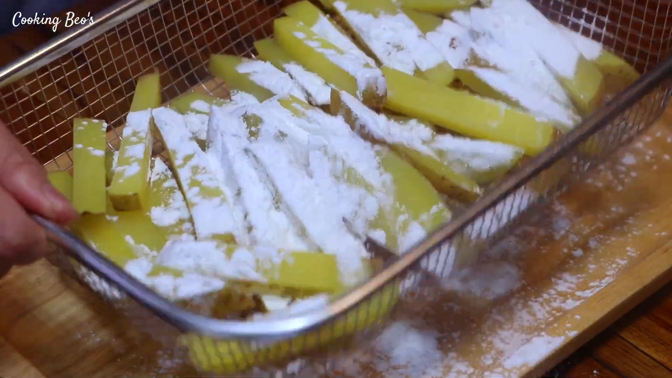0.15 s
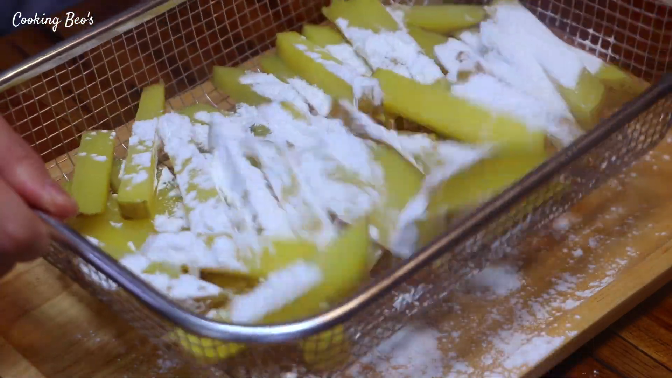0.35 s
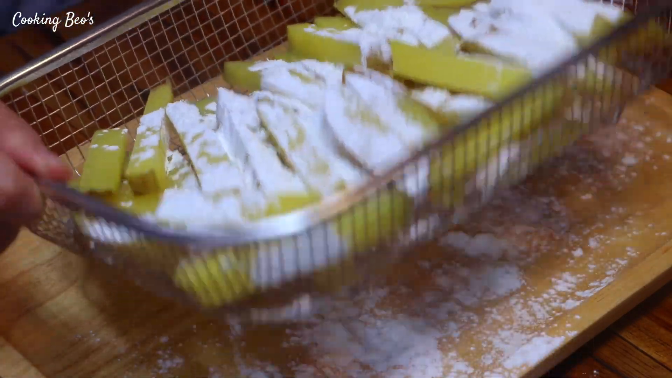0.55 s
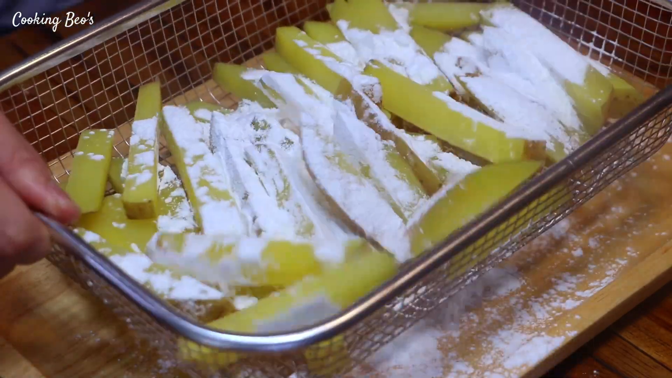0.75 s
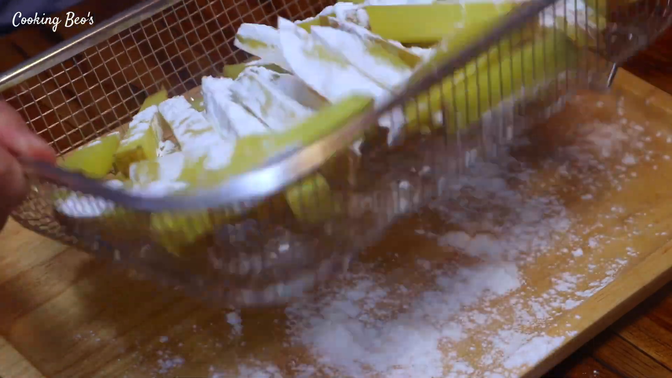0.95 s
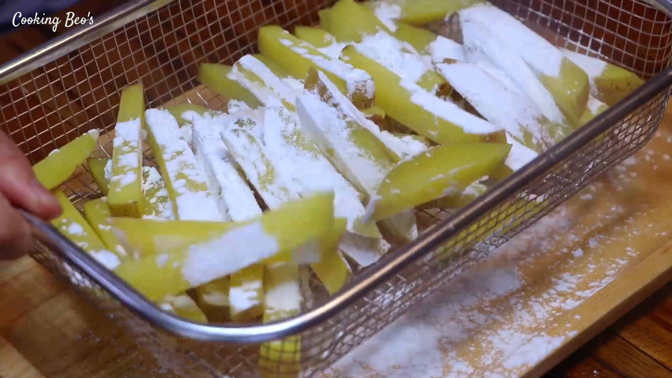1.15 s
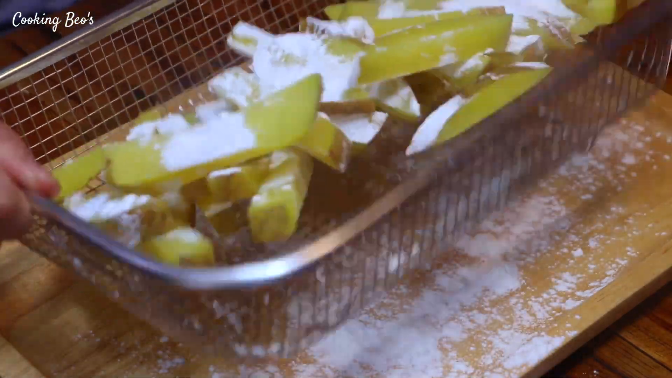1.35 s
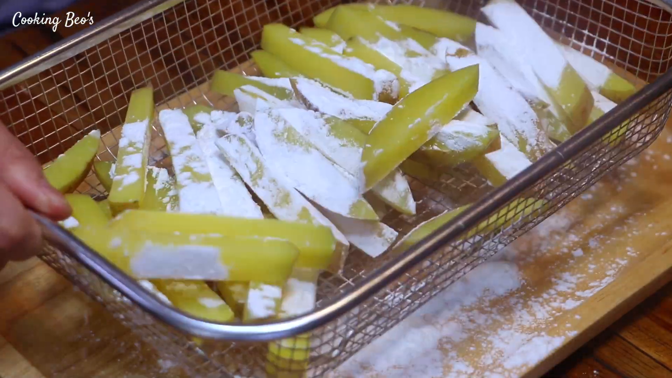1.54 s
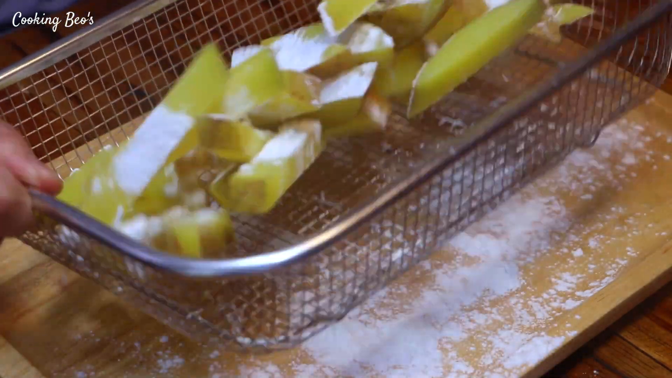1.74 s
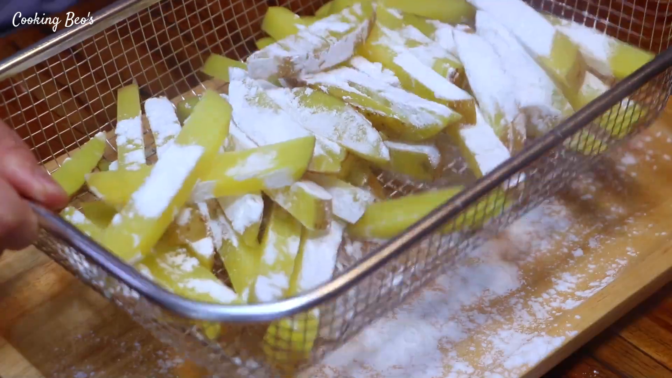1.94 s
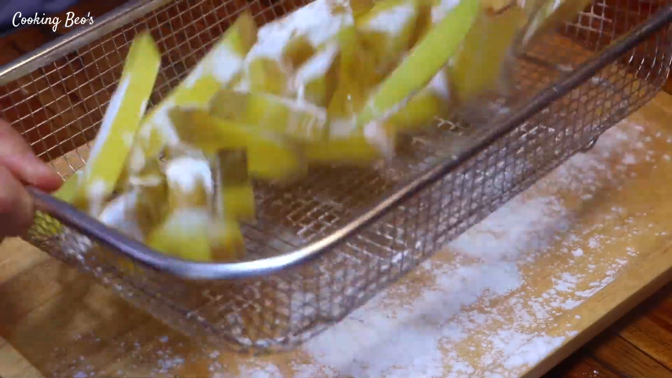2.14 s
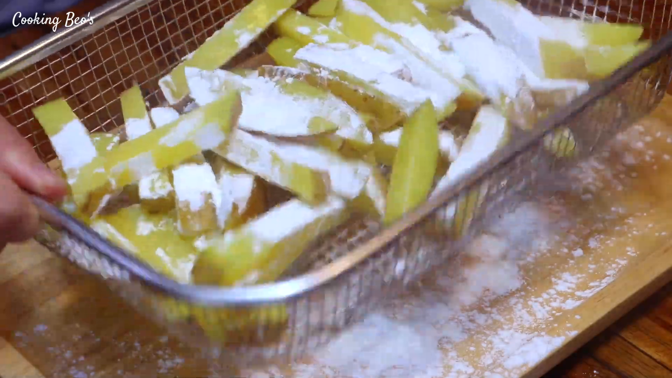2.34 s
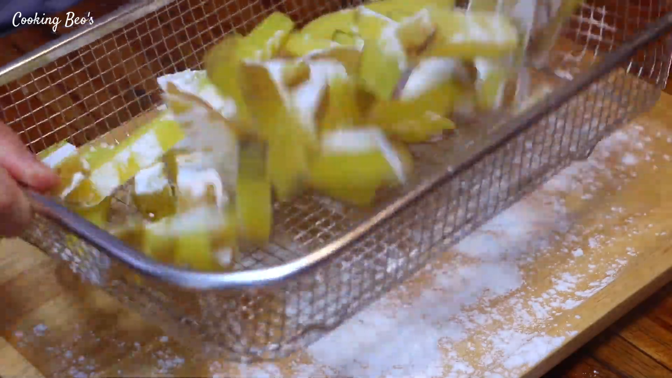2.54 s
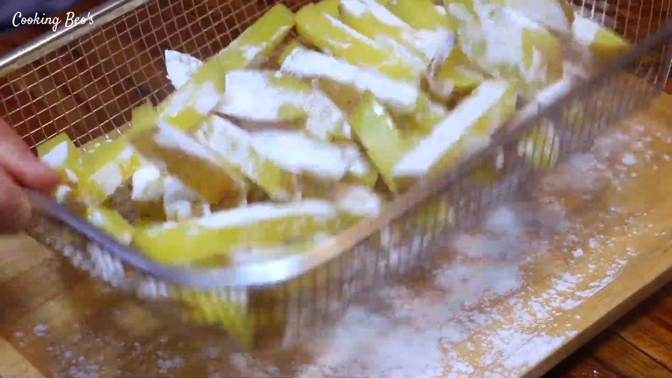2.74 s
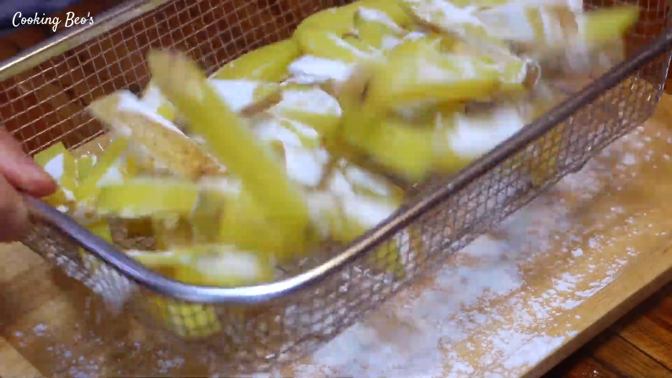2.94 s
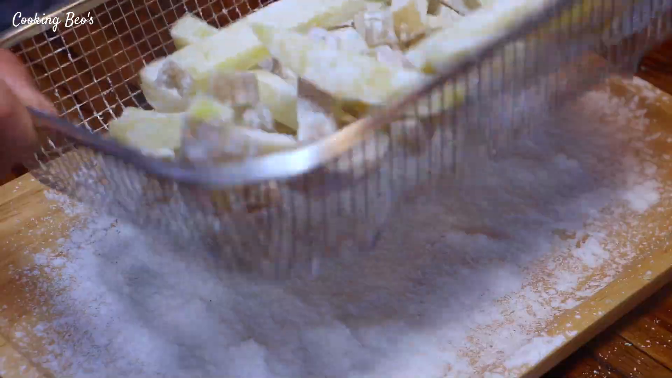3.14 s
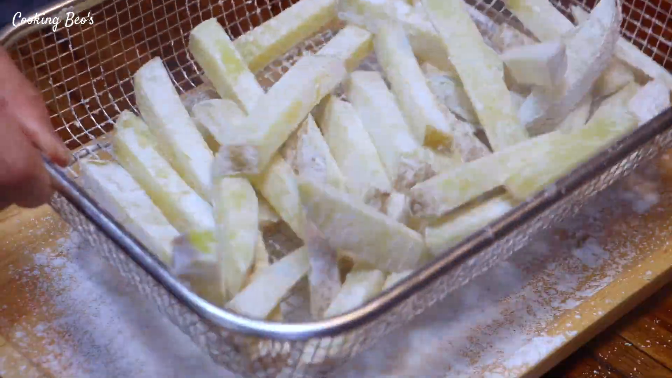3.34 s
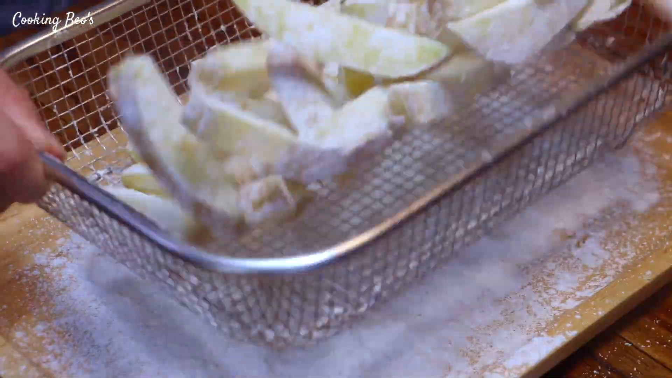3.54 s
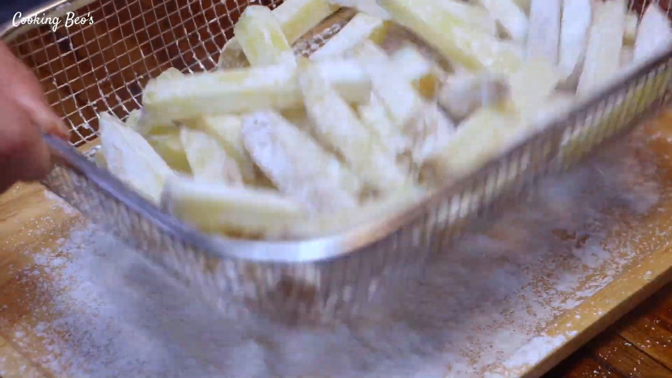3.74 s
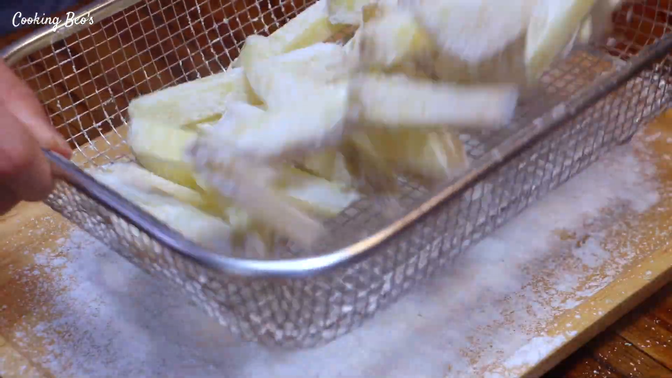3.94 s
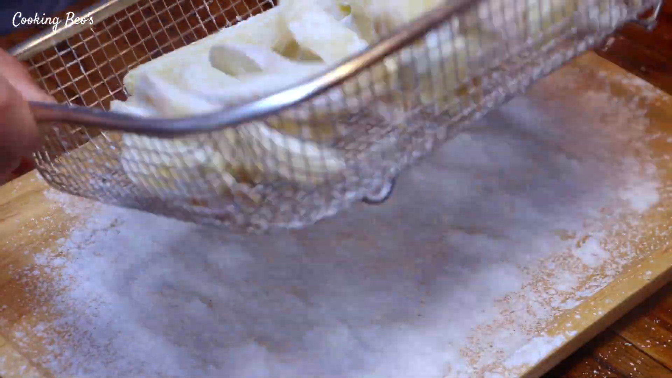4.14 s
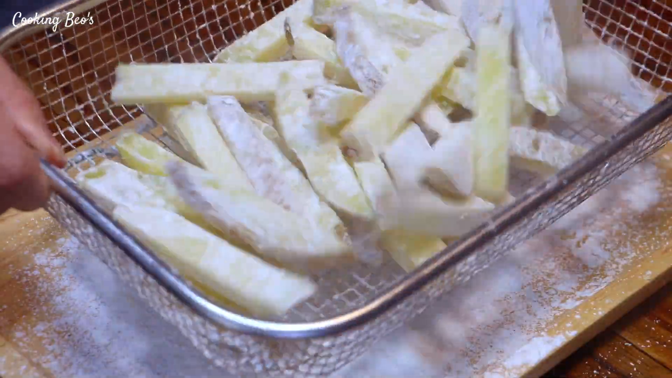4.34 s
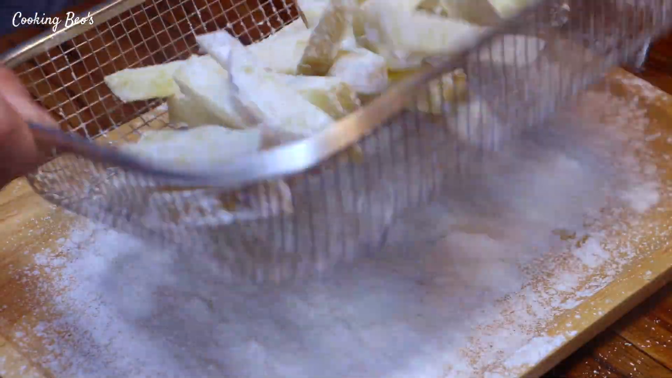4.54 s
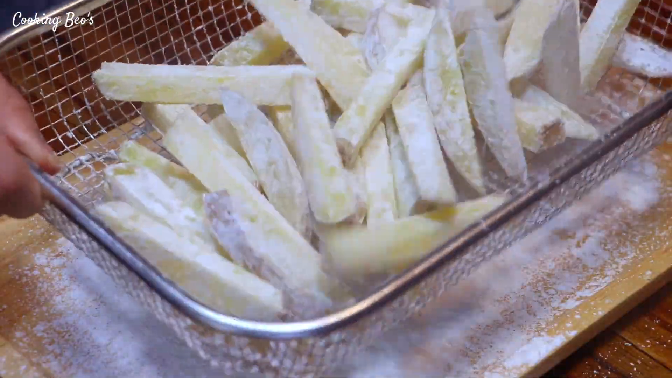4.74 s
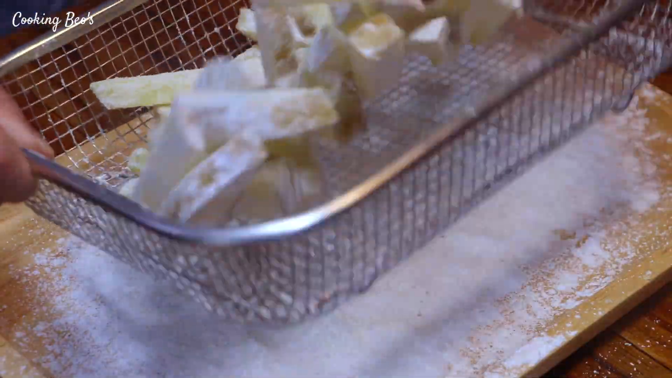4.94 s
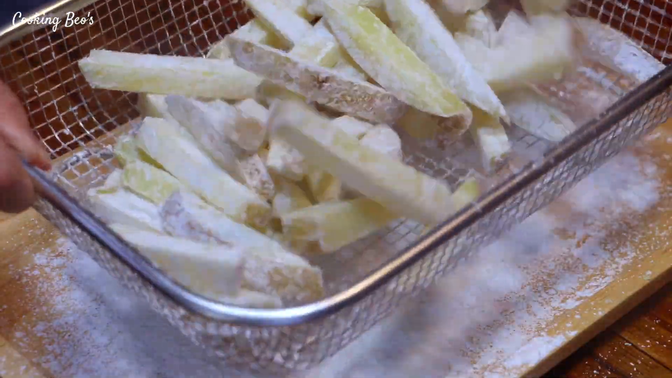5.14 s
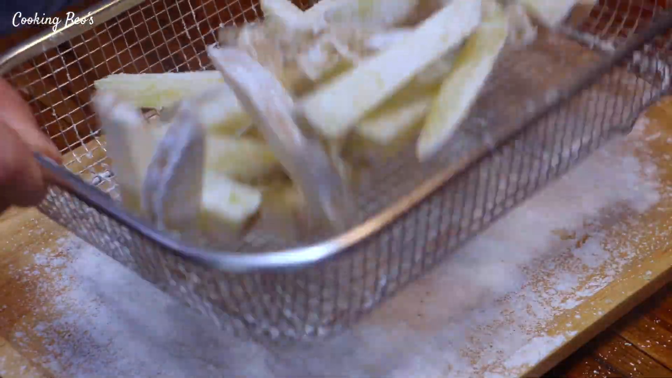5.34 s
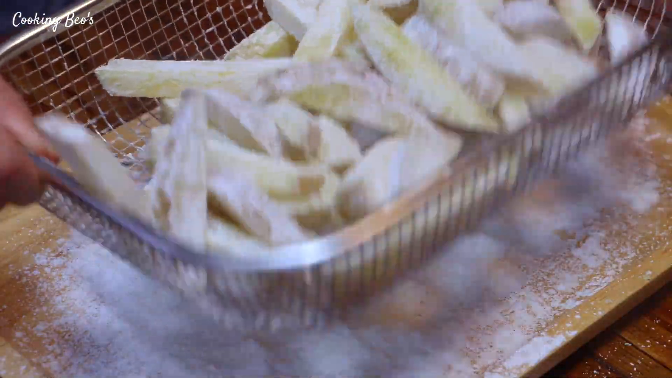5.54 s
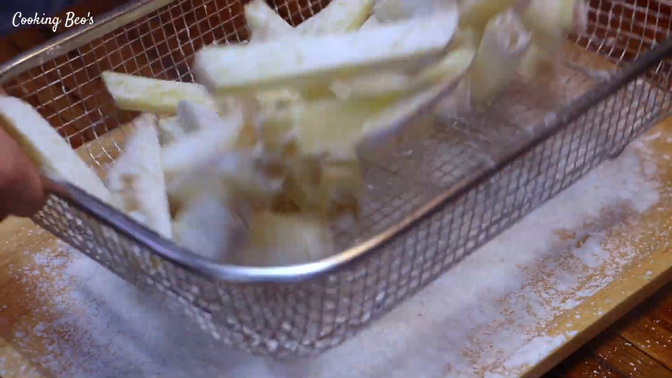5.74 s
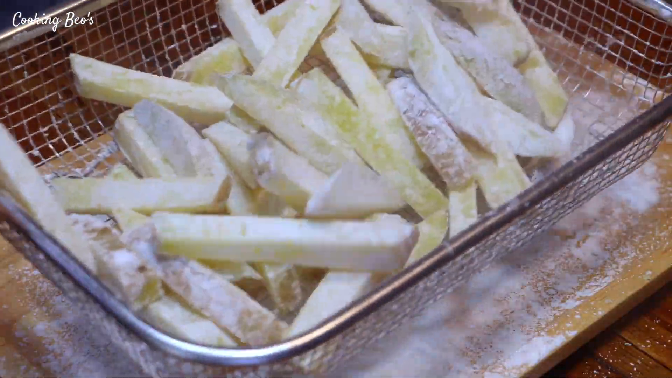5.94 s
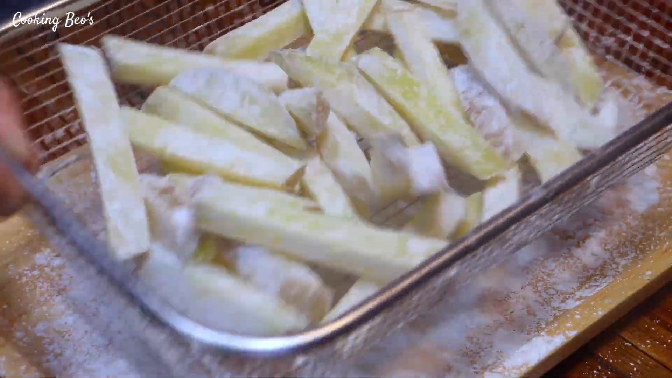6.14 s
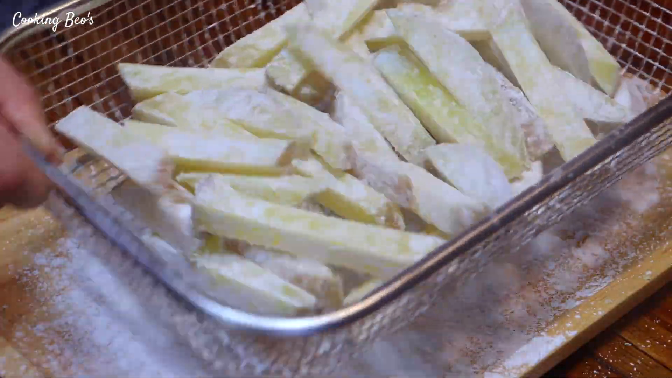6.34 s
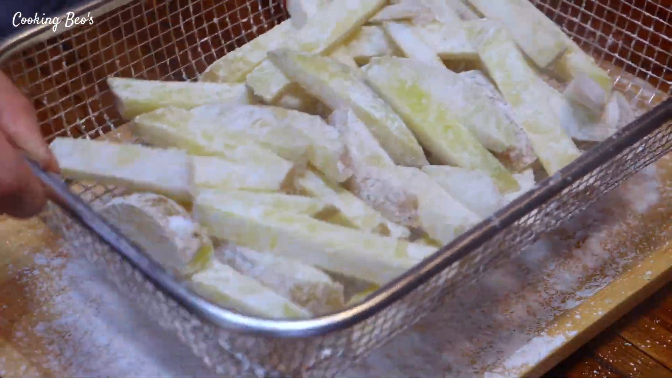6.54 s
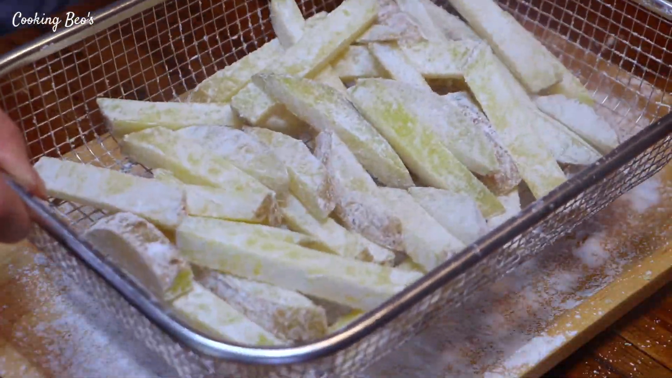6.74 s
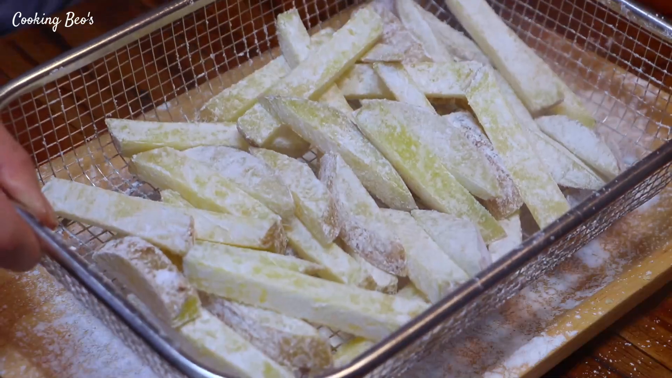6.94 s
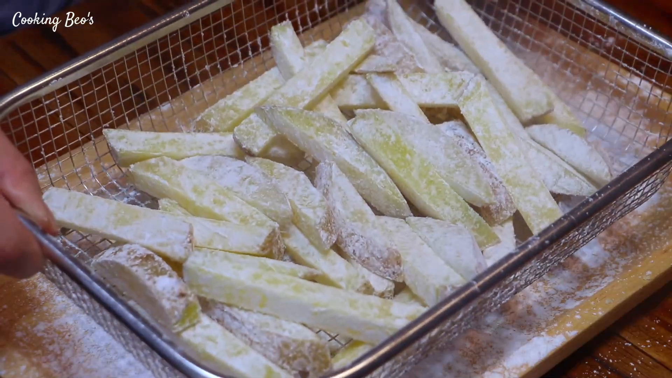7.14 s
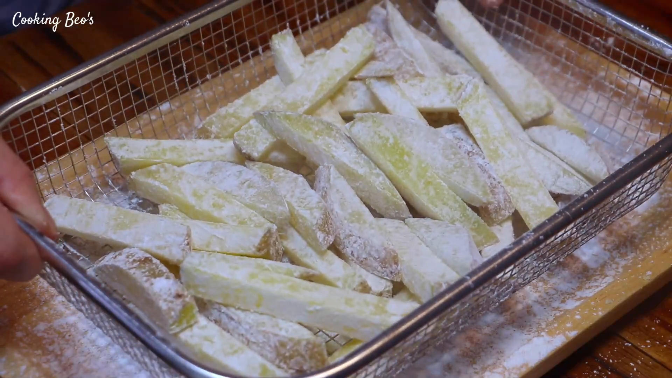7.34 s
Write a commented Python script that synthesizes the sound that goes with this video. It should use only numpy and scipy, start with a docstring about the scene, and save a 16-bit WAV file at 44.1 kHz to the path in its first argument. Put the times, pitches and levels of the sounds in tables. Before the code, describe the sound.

Close up in a quiet kitchen, a wire-mesh basket of starch-dusted potato sticks is tossed almost three times a second. Each landing gives a bright, raspy mesh buzz with dull patter and occasional firm clicks. After about six seconds the sticks settle with faint shuffles, then two groups of dull wooden knocks follow, the last strongest.

```python
"""A wire-mesh basket of starch-dusted potato sticks is tossed almost three times a second in a quiet kitchen.
At each landing noise bursts excite wire resonances, so the mesh buzzes against its frame; random
collisions make the sticks patter, and damped sine waves make firmer sticks click.
The sticks settle, then something is set down in two groups of dull knocks, with a light scrape before the
last: noise through modes of wood. Sparse reflections form the room, over shaped noise and a sine-wave hum."""
import sys
import numpy as np
from scipy import signal
from scipy.io import wavfile
from scipy.ndimage import uniform_filter1d

SR = 44100
rng = np.random.default_rng(int(sys.argv[2]) if len(sys.argv) > 2 else 0)


def unload_audio(sound):
    """Save the sound as a 16-bit wav file, at the path given as the first command line argument."""
    columns = np.transpose(np.atleast_2d(sound))
    # keep every value between -1 and 1, then stretch to whole-number steps
    steps = np.round(np.clip(columns, -1, 1) * 32767)
    wavfile.write(sys.argv[1], SR, steps.astype(np.int16))


N = 325458


def amp(db):
    """Level law: twenty decibels are a factor of ten in amplitude."""
    return 10 ** (np.asarray(db) / 20)


def unit(x):
    """Normalization: scale a signal to an rms value of 1."""
    return x / np.sqrt(np.mean(x ** 2) + 1e-20)


def read(points, hz):
    """Logarithmic pitch scale: interpolate a short spectrum along log frequency."""
    f, value = np.transpose(points)
    return np.interp(np.log(hz + 1), np.log(f), value)


def add(mix, s, sound):
    """Superposition: add a sound to the mix from time s in seconds."""
    part = mix[round(s * SR):][:len(sound)]
    part += sound[:len(part)]


def colour(x, spectrum, size=2048):
    """Minimum-phase filtering: a causal response of unit energy follows the given spectrum."""
    log_gain = np.log(amp(read(spectrum, abs(np.fft.fftfreq(size, 1 / SR)))))
    response = np.exp(np.conj(signal.hilbert(log_gain)))
    impulse = np.fft.ifft(response).real[:size // 2]
    return signal.fftconvolve(x, impulse / np.linalg.norm(impulse))[:len(x)]


def resonate(x, hz, width_hz):
    """Damped resonance: a rotating, shrinking pole of gain about 1, broader when damped more."""
    r = np.exp(-np.pi * width_hz / SR)
    return 2 * signal.lfilter([1 - r], [1, -r * np.exp(2j * np.pi * hz / SR)], x).imag


def clicks(count, per_s, spread_db):
    """Random impacts: independent contacts of random sign, most of them light and a few hard."""
    chance, size, hardness = rng.random(count), rng.standard_normal(count), rng.random(count)
    strength = amp(-spread_db * np.log(hardness + 0.067))
    return (chance < per_s / SR) * np.sign(size) * strength


def burst(t, length, rise, fall):
    """Transient envelope: swells, holds for the length, and decays exponentially."""
    return (1 - np.exp(-(t / rise) ** 2)) * np.exp(-np.maximum(t - length, 0) / fall)


# Resonances of the wires. Each row: nominal frequency in Hz, width in Hz, relative level in dB.
WIRE_RING = [(3708, 70, -2.5), (3802, 130, -4), (3710, 210, -14)]
# Spectrum of wires rubbing. Each row: frequency in Hz, relative level in dB.
WIRE_SIZZLE = [(300, -45.5), (2000, -18.5), (2900, -20.5), (3500, -6.5), (4400, -0.5), (5700, 3.5),
               (6900, 3.5), (8500, -1), (9700, -1.5), (11200, -6), (12500, -4.5), (16000, -11.5)]
USUAL_SLAM_DB, THUD_SHARE = -32, 0.32  # the thud follows the landing, and the slam's own force by this share
DAMPING_DB_PER_S = 18.5  # as the sticks pile onto the wires, they ring less


def buzzes(ring_db=0.1, sizzle_db=0., thud_db=2.5, detune=0.023, wire_db=-1.5, size=3000):
    """Forced vibration: chattering contacts excite damped wire modes, slightly retuned at every slam."""
    out, t = np.zeros(N), np.arange(size) / SR
    for s, length, force_db in mesh_hits():
        # the landing whose tumbling ends nearest to this slam
        landing, _, _, load_db, _ = min(LANDINGS, key=lambda toss: abs(toss[0] + toss[2] - s))
        push = burst(t, length, rise=.0012, fall=.003)
        chatter = rng.standard_normal(size) * push  # hundreds of wire crossings rub at once
        tension = 1 + detune * rng.standard_normal()
        ring = sum(amp(db) * resonate(chatter, hz * tension, width) for hz, width, db in WIRE_RING)
        # a few shorter wires stand out, different ones wherever the load lands
        short_wires = sum(resonate(chatter, hz, 520) for hz in rng.uniform(4600, 10000, size=3))
        sizzle = colour(chatter + amp(wire_db) * short_wires, WIRE_SIZZLE)
        thud = stick_clacks(burst(t, length, rise=0.0004, fall=0.0035), per_s=4000)
        ring_gain = amp(ring_db - DAMPING_DB_PER_S * (s - landing))
        sizzle_gain = amp(sizzle_db + clearing_db(s))
        wires = amp(force_db) * (ring_gain * unit(ring) + sizzle_gain * unit(sizzle))
        weight = amp(thud_db + load_db + THUD_SHARE * (force_db - USUAL_SLAM_DB))
        push_rms = np.sqrt(np.mean(push ** 2))
        add(out, s - .0005, push_rms * (wires + weight * unit(thud)))
    return out


# The load slams the mesh against its frame. Each row: start in seconds, length in seconds, force in dB.
MESH_SLAMS = [(.055, 0.0018, -26), (.08, 0.013, -27), (.1078, 0.0076, -46), (.419, .005, -34.5),
              (.439, 0.0074, -34), (.4853, 0.0062, -31), (.7992, 0.0062, -25), (.8141, .007, -28.5),
              (1.1266, .013, -32), (1.144, 0.025, -29.5), (1.1743, 0.0096, -27.5), (1.2173, 0.0066, -30),
              (1.5074, 0.0055, -26), (1.522, 0.0061, -34), (1.5506, 0.0078, -27.5), (1.888, .012, -32.5),
              (1.9004, 0.0079, -27), (1.9652, 0.0073, -32), (2.272, 0.019, -34), (2.2996, 0.0061, -38),
              (2.3698, .005, -35), (2.6547, 0.013, -23.5), (2.698, 0.015, -32), (2.7254, 0.011, -30.5),
              (3.0335, .01, -32), (3.324, 0.0075, -38.5), (3.3552, 0.0056, -35.5), (3.4173, 0.002, -23.5),
              (3.6806, 0.0097, -25.5), (3.711, 0.011, -33), (3.7238, 0.0087, -30), (3.7627, 0.0065, -38.5),
              (3.8702, 0.0059, -36), (4.0267, 0.0041, -31.5), (4.063, 0.0063, -27.5), (4.1114, 0.0067, -30),
              (4.146, .004, -29), (4.3372, 0.0041, -29.5), (4.376, 0.0063, -23.5), (4.4464, 0.0052, -32.5),
              (4.707, 0.0058, -31), (4.7242, 0.015, -33.5), (4.739, 0.0084, -30.5), (4.783, 0.0034, -27.5),
              (4.8131, 0.0041, -41), (5.0693, 0.0065, -34.5), (5.089, .0064, -24), (5.1352, 0.009, -27.5),
              (5.201, 0.011, -37), (5.4532, 0.0024, -45.5), (5.4945, 0.012, -25), (5.5314, 0.0085, -35),
              (5.573, 0.0054, -24), (5.8265, 0.0052, -22), (5.8692, .0065, -16), (5.9353, 0.012, -31.5),
              (5.9882, 0.002, -34)]
LIGHT_DB, LIGHT_SPREAD_DB, LIGHT_S = -2.5, 4.5, .003  # lighter buzzes: force re the toss level, spread, length


def mesh_hits(count=3):
    """Repeated contact: heavy slams, and lighter buzzes scattered through each toss."""
    hits = list(MESH_SLAMS)
    for s, _, length, db, _ in LANDINGS:
        for k, (place, force) in enumerate(rng.uniform(-1, 1, (count, 2))):
            start = s + length * (k + .5 + .5 * place) / count
            hits.append((start, LIGHT_S, db + LIGHT_DB + LIGHT_SPREAD_DB * force))
    return hits


CLEARING_DB_PER_S = 0.25  # the mesh sizzles more as the heap of starch is shaken off it


def clearing_db(s):
    """Decreasing damping: the barer wires sizzle more, from a zero half way through."""
    return CLEARING_DB_PER_S * (s - .5 * N / SR)


# The load lands in the basket. Each row: start in seconds, lead-in of the first sticks in seconds,
# time it keeps tumbling in seconds, patter level in dB before the layer gains, share of stragglers in dB.
LANDINGS = [(.055, 0.0027, 0.069, -35.5, -15.5), (.419, 0.0028, 0.08, -37, -19),
            (.785, 0.018, 0.058, -35, -8), (1.138, .012, 0.088, -38, -12.5),
            (1.508, 0.019, 0.081, -35, -21.5), (1.897, 0.039, 0.089, -38, -20),
            (2.277, 0.041, 0.054, -38, -10.5), (2.657, 0.04, 0.1, -39.5, -7),
            (3.03, 0.051, .062, -41.5, -29), (3.325, 0.037, .11, -44, -21), (3.68, 0.031, 0.11, -42, -5.5),
            (4.06, 0.053, 0.094, -42, -24), (4.35, 0.02, 0.12, -43, -20), (4.718, 0.019, 0.11, -43.5, -20),
            (5.08, 0.03, 0.18, -43, -16.5), (5.492, 0.038, 0.1, -41, -16), (5.828, 0.011, 0.13, -40, -16.5)]
# Hiss of dry starch. Each row: frequency in Hz, relative level in dB.
POWDER_HISS = [(2000, -19.5), (7000, -17.5), (10000, 1), (12500, -2), (16000, -1)]
STOP_S = 0.01  # most sticks stop at once


def tumbling(patter_db=-2.5, scrape_db=-6.5, stir_db=6.0, stir_ahead=0.014, stir_damping=.5,
             sift_db=-15.5, sift_lag=.04):
    """Granular impact and friction: soft collisions of the sticks, and their scraping along the wires."""
    t = np.arange(N) / SR
    motion = load_motion(LANDINGS, STOP_S)
    sticks = np.sqrt(np.mean(motion ** 2)) * unit(stick_clacks(motion, per_s=1400))
    contacts = unit(clicks(N, per_s=6100, spread_db=5.5))
    scrape = colour(motion * amp(clearing_db(t)) * contacts, WIRE_SIZZLE)
    # the swing of the basket stirs the wires just before the sticks come down and damp them
    coming_motion = np.interp(t + stir_ahead, t, motion)
    swing = np.maximum(coming_motion - stir_damping * motion, 0) * rng.standard_normal(N)
    stir = resonate(resonate(swing, 3780, 550), 3780, 550)
    # loosened starch keeps sifting through the mesh for a moment
    keep = np.exp(-1 / (sift_lag * SR))
    loose_starch = signal.lfilter([1 - keep], [1, -keep], motion)
    sift = colour(loose_starch * rng.standard_normal(N), POWDER_HISS)
    return amp(patter_db) * sticks + amp(scrape_db) * scrape + amp(stir_db) * stir + amp(sift_db) * sift


# Spectrum of soft potato flesh. Each row: frequency in Hz, relative level in dB.
STICK_FLESH = [(60, -33), (150, -23), (280, -2.5), (500, -1.5), (800, 0.5), (1120, 2), (1600, -4.5),
               (2300, -7.5), (4000, -1.5), (9000, -22.5)]


def stick_clacks(force, per_s, low_hz=418.0, high_hz=1540.0, width_hz=100.0, clack_db=0.0, count=10):
    """Impact excitation of modes: sticks of many lengths give a dull puff and a short pitch each."""
    place = (np.arange(count) + rng.random(count)) / count
    pitches = low_hz * (high_hz / low_hz) ** place
    out = np.zeros(len(force))
    for hz in pitches:
        hits = force * clicks(len(force), per_s / count, spread_db=6.0)
        out += hits + amp(clack_db) * resonate(hits, hz, width_hz)
    return colour(out, STICK_FLESH)


def load_motion(tosses, stop_s, size=16):
    """Superposed motion: how hard the sticks are moving, from moment to moment."""
    t = np.arange(0, N, size) / SR
    motion = sum(tumble(t, *toss, stop_s) for toss in tosses)
    return np.interp(np.arange(N) / SR, t, motion)


LEAD_IN_DB, SAG_DB = -11.5, -3  # the first sticks are this much softer; the patter sags this much
ARRIVE_S, STRAGGLE_S = 0.0077, 0.063  # the patter sets in quickly; a few sticks keep sliding


def tumble(t, s, lead_in, length, db, stragglers_db, stop_s):
    """Dissipation of motion: the first sticks arrive, the rest tumble, then all come to rest."""
    early, late = np.maximum(s - t, 0), np.maximum(t - s - length, 0)
    arrival = np.exp(-(np.maximum(early - lead_in, 0) / ARRIVE_S) ** 2)
    lead_db = LEAD_IN_DB * np.minimum(early / lead_in, 1)
    sag_db = SAG_DB * np.clip((t - s) / length, 0, 1)
    stragglers = amp(stragglers_db)  # their share of the motion
    rest = (1 - stragglers) * np.exp(-late / stop_s) + stragglers * np.exp(-late / STRAGGLE_S)
    return arrival * amp(db + lead_db + sag_db) * rest


# Single sticks land on end. Each row: start in seconds, peak in dB, pitch in Hz,
# 60 dB decay time in seconds, shaking of the neighbours in dB relative to the pitch.
STICK_TAPS = [(0.1043, -21, 1204, 0.012, -4), (0.4704, -19.5, 1034, 0.011, -37),
              (.8185, -22.5, 850, 0.012, -14), (1.1978, -22.5, 595, 0.013, -6.5),
              (1.217, -19.5, 1100, 0.009, -18), (1.551, -21, 710, 0.013, -5),
              (1.582, -30, 1150, 0.017, -20), (1.843, -42.5, 474, 0.031, -15),
              (2.283, -22.5, 772, 0.024, -6), (2.3522, -19, 1590, 0.0034, -23),
              (3.726, -23.5, 1370, 0.0038, -23), (5.205, -23, 1060, 0.0059, -1),
              (5.2998, -22, 1200, 0.0014, -21.5), (6.195, -38, 1200, 0.026, -8),
              (6.333, -38, 1360, 0.02, -9), (6.495, -51, 1000, 0.034, -5)]


def taps(snap_db=0., soft_hz=3600., size=1800):
    """Free vibration: a firm stick rings a few cycles and shakes its neighbours; soft flesh limits treble."""
    out, t = np.zeros(N), np.arange(size) / SR
    soften = signal.butter(4, soft_hz, fs=SR)
    for s, db, hz, t60, shake_db in STICK_TAPS:
        knock = np.sin(2 * np.pi * hz * t) * amp(-60 * t / t60)
        snap = amp(snap_db) * np.sin(2 * np.pi * 1.4 * hz * t) * amp(-60 * t / (0.49 * t60))
        neighbours = unit(colour(rng.standard_normal(size), STICK_FLESH))
        shake = amp(shake_db) * neighbours * np.exp(-t / 0.0046)
        contact = np.minimum(t / (0.098 * t60), 1)  # a longer ring comes from a softer landing
        tap = signal.lfilter(*soften, (knock + snap + shake) * contact)
        add(out, s, amp(db) * tap / abs(tap).max())
    return out


# Light swishes of powder between tosses. Each row: start in seconds, length in seconds,
# level in dB of the noise before its envelope.
POWDER_SWISHES = [(0.708, 0.0025, -39), (2.121, .002, -56)]


def swishes(size=2000):
    """Friction noise: dry powder slides over the wires with a brief high hiss."""
    out, t = np.zeros(N), np.arange(size) / SR
    for s, length, db in POWDER_SWISHES:
        hiss = unit(colour(rng.standard_normal(size), POWDER_HISS))
        add(out, s, amp(db) * hiss * burst(t, length, rise=0.0016, fall=0.0046))
    return out


# The last small jiggles. Each row: start in seconds, lead-in in seconds, tumbling time in seconds,
# level in dB before the layer gains, share of stragglers in dB.
LAST_JIGGLES = [(6.205, 0.039, .03, -56.5, -16), (6.32, 0.033, .035, -61, -17),
                (6.425, 0.016, .05, -65, -19)]
SETTLE_S = 0.14  # they die away slowly


def settling(sticks_db=-0.5, wires_db=-7.0, powder_db=-8.5):
    """Decaying granular contact: the sticks shift softly and a little starch sifts through."""
    motion = load_motion(LAST_JIGGLES, SETTLE_S)
    out = np.zeros(N)
    for level, spectrum in ((sticks_db, STICK_FLESH), (wires_db, WIRE_SIZZLE), (powder_db, POWDER_HISS)):
        contacts = unit(clicks(N, per_s=1800, spread_db=0.5))
        out += amp(level) * colour(motion * contacts, spectrum)
    return out


# Dull knocks on wood, with a light, brighter scrape just before the last one.
# Each row: start in seconds, peak of the blow in dB, contact cut-off in Hz, boom of the counter in dB.
KNOCKS_AND_SCRAPE = [(7.1826, -32.5, 6500, -45), (7.1989, -34, 1090, -51), (7.2069, -44, 3900, -61.5),
                     (7.231, -46.5, 400, -54), (7.318, -43, 7000, -75), (7.3445, -26, 5440, -63),
                     (7.3485, -18, 1800, -36)]
# Modes of the wood. Each row: frequency in Hz, width in Hz, relative level in dB.
WOOD_MODES = [(639, 52, 7.5), (910, 53, 4.5), (1037, 57, -3.5), (1196, 74, -0.5), (1465, 170, -15),
              (1795, 91, -10), (2450, 170, -6.5), (3300, 310, -18)]
# Spectrum of the crack. Each row: frequency in Hz, relative level in dB.
WOOD_CRACK = [(60, -26), (400, 2.5), (700, -2), (2500, 0.5), (3700, 1), (4200, -17), (6000, -12.5),
              (9000, -24), (16000, -44)]
# Low modes of the counter. Each row: frequency in Hz, relative level in dB, 60 dB decay time in seconds.
COUNTER_MODES = [(60, -12, 0.296), (124, -13, 0.18), (166.5, 1, 0.23), (222, -8, 0.11)]
# Rough rumble under each contact. Each row: frequency in Hz, relative level in dB.
RUMBLE_SPECTRUM = [(25, -50), (50, -16), (90, -17), (170, 1), (280, -4), (420, -15), (640, -1),
                   (1100, -12.5), (1800, -35), (5000, -53)]


def knocks(crack_db=-16.5, rumble_db=2.0, rumble_fall=0.032, size=16000):
    """Modal excitation: rough contact drives damped wood and counter modes; soft contacts sound darker."""
    out, t = np.zeros(N), np.arange(size) / SR
    for s, db, contact_hz, boom_db in KNOCKS_AND_SCRAPE:
        contact = rng.standard_normal(size) * np.exp(-t / 0.0061)
        modes, low = np.zeros(size), np.zeros(size)
        # neighbouring modes alternate in sign
        for k, (hz, width, level) in enumerate(WOOD_MODES):
            modes += (-1) ** k * amp(level) * resonate(contact, hz, width)
        for k, (hz, level, t60) in enumerate(COUNTER_MODES):
            low += (-1) ** k * amp(level - 60 * t / t60) * np.sin(2 * np.pi * hz * t)
        soften = signal.butter(2, contact_hz, fs=SR)
        blow = signal.lfilter(*soften, modes + amp(crack_db) * colour(contact, WOOD_CRACK))
        rough_noise = unit(colour(rng.standard_normal(size), RUMBLE_SPECTRUM, size=8192))
        boom = low + amp(rumble_db) * rough_noise * np.exp(-t / rumble_fall)
        add(out, s, amp(db) * blow / abs(blow).max() + amp(boom_db) * boom)
    return out


# Reverberation of the kitchen. Each row: frequency in Hz, 60 dB decay time in seconds.
KITCHEN_T60 = [(150, 0.6), (660, 0.4), (1740, 0.43), (4600, 0.4), (12000, 0.51)]
# Level of the kitchen's tail. Each row: frequency in Hz, level in dB.
KITCHEN_DB = [(150, -6), (700, -11.5), (2000, -9.5), (3200, -10), (3700, -15.5), (4200, -8.5), (6000, -12),
              (14000, -17.5)]


def kitchen(x, onset=0.0069, count=1600, size=22):
    """Reverberation: sparse reflections of random sign, each band dying at its own speed."""
    echoes = np.zeros(count * size)
    places = np.arange(count) * size + rng.integers(0, size, count)
    echoes[places] = rng.choice([-1., 1.], count)
    echoes *= 1 - np.exp(-np.arange(len(echoes)) / SR / onset)
    hz, t, z = signal.stft(echoes, SR, nperseg=256)
    z = z * amp(-60 * t / read(KITCHEN_T60, hz)[:, None])
    energy = np.linalg.norm(signal.istft(z, SR)[1])  # norm of the tail before its colouring
    tail = signal.istft(z * amp(read(KITCHEN_DB, hz))[:, None], SR)[1] / energy
    return signal.fftconvolve(x, tail)[:N]


def changing_echo(x, turn_hz=4.3, count=4):
    """Changing interference: all direct sounds pass steadily through changing patterns of reflections."""
    angle = 2 * np.pi * turn_hz * np.arange(N) / SR
    patterns = sum(kitchen(x * np.cos(angle + np.pi * k / count)) for k in range(count))
    return patterns * np.sqrt(2 / count)


# Spectrum of the room air. Each row: frequency in Hz, relative level in dB.
ROOM_AIR = [(18, -41), (30, -9), (70, -22.5), (86, -19), (170, -5), (199, -17), (227, -3), (259, -23),
            (295, -10), (1860, -29), (2060, -20.5), (2480, -28), (16000, -36.5)]
# Hum of an appliance. Each row: mean frequency in Hz, level in dB.
APPLIANCE_HUM = [(100, -77), (172, -87.5), (231, -81), (2073, -83)]


def background(air_db=-65.5, waver_hz=3.2):
    """Stationary noise and frequency modulation: quiet room air and the wavering hum of an appliance."""
    out = amp(air_db) * unit(colour(rng.standard_normal(N), ROOM_AIR, size=8192))
    for hz, db in APPLIANCE_HUM:
        drift = waver_hz * unit(uniform_filter1d(rng.standard_normal(N), size=2000))
        phase = 2 * np.pi * np.cumsum(hz + drift) / SR
        out += amp(db) * unit(np.sin(phase))
    return out


def scene(open_mesh_hz=133.0):
    """Radiation and superposition: an open mesh radiates almost no bass; the room adds its reflections."""
    basket = buzzes() + tumbling() + taps() + swishes() + settling()
    no_bass = signal.butter(3, open_mesh_hz, "high", fs=SR, output="sos")
    direct = signal.sosfilt(no_bass, basket) + knocks()
    return (direct + changing_echo(direct) + background())[None]


def record(dry, double_db=-12.0, lead_s=.01742, bass_hz=45, edge_hz=15950):
    """Comb filtering and band limiting: a fainter copy runs just ahead, then deep bass and top are cut."""
    lead = round(lead_s * SR)
    ahead = np.pad(dry[:, lead:], ((0, 0), (0, lead)))
    doubled = dry + amp(double_db) * ahead
    high_pass = signal.butter(3, bass_hz, "high", fs=SR, output="sos")
    doubled = signal.sosfilt(high_pass, doubled)  # the microphones lose deep bass
    low_pass = signal.firwin(511, edge_hz, window=("kaiser", 9), fs=SR)
    return signal.oaconvolve(doubled, low_pass[None], "same")


dry = scene()
out = record(dry)
unload_audio(out)
```